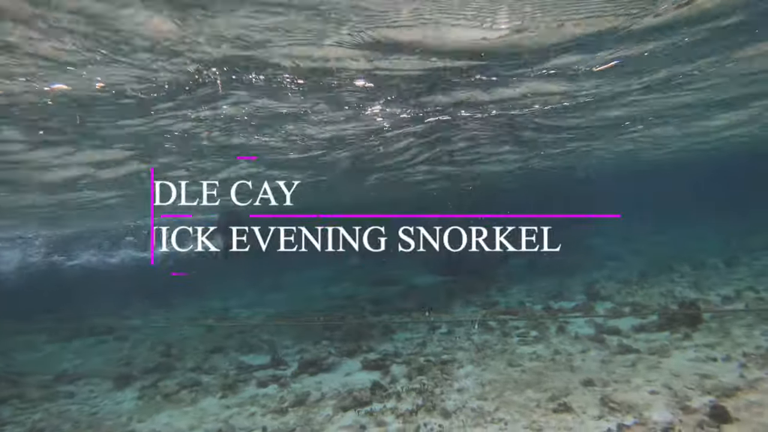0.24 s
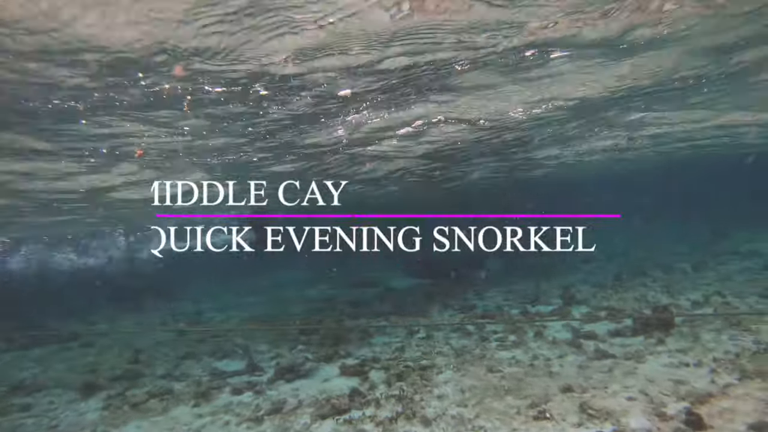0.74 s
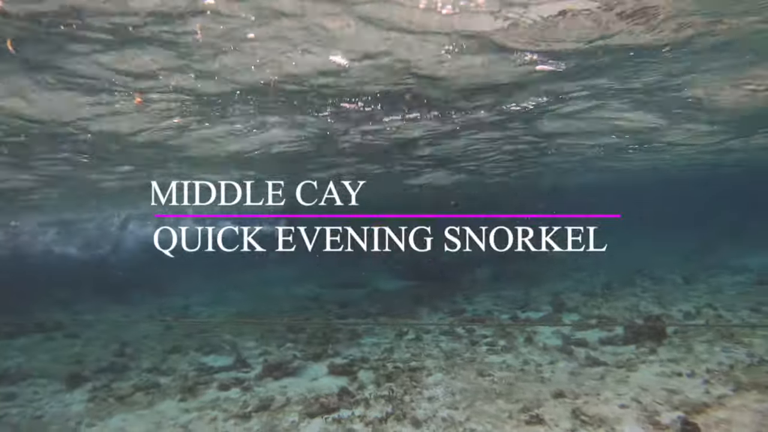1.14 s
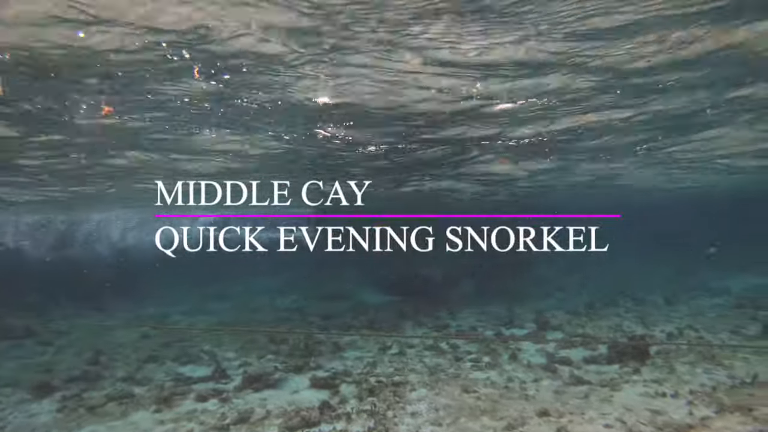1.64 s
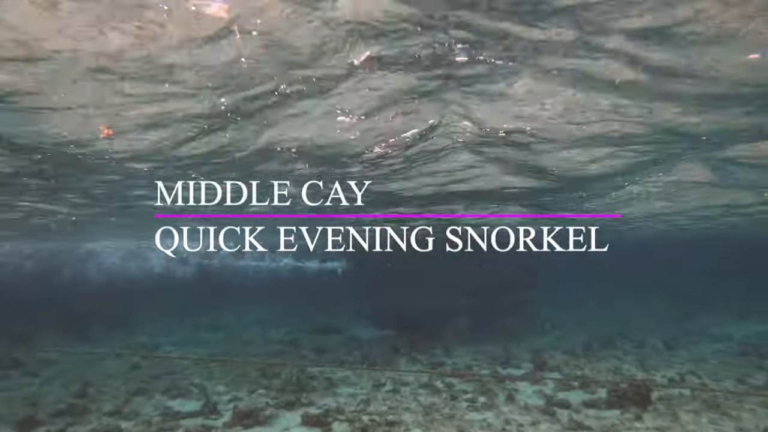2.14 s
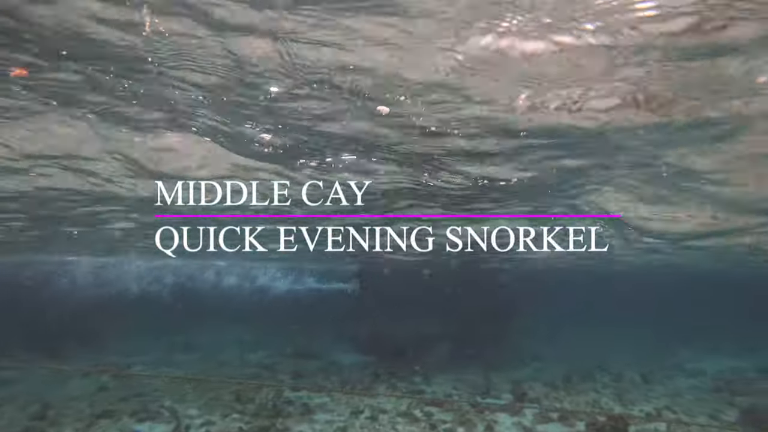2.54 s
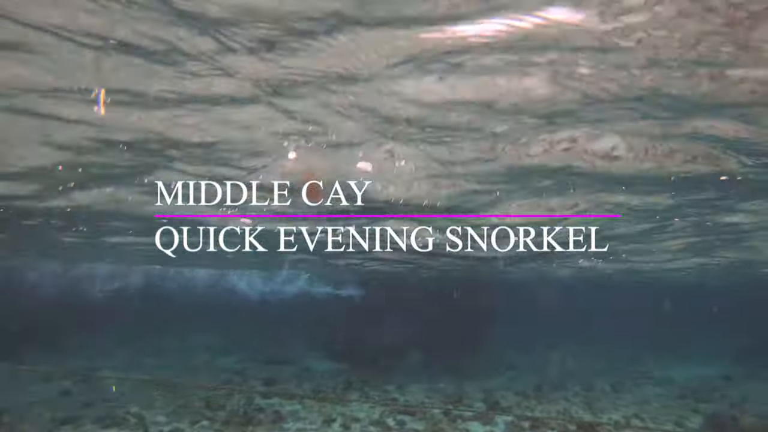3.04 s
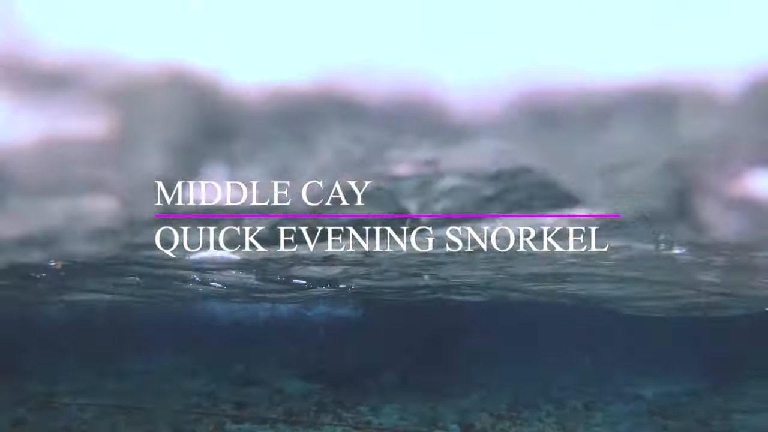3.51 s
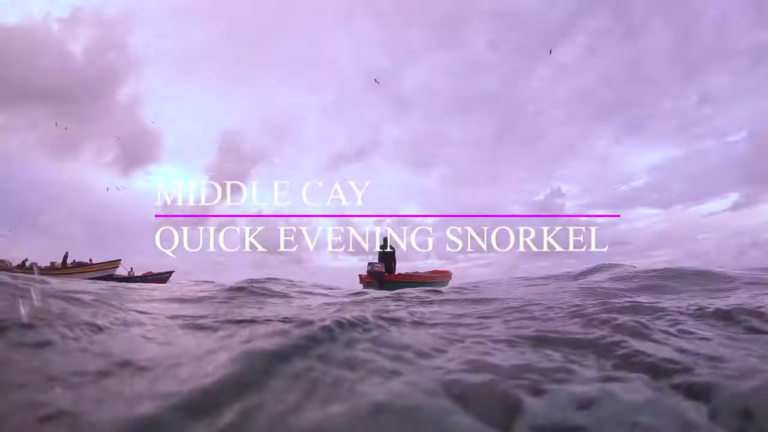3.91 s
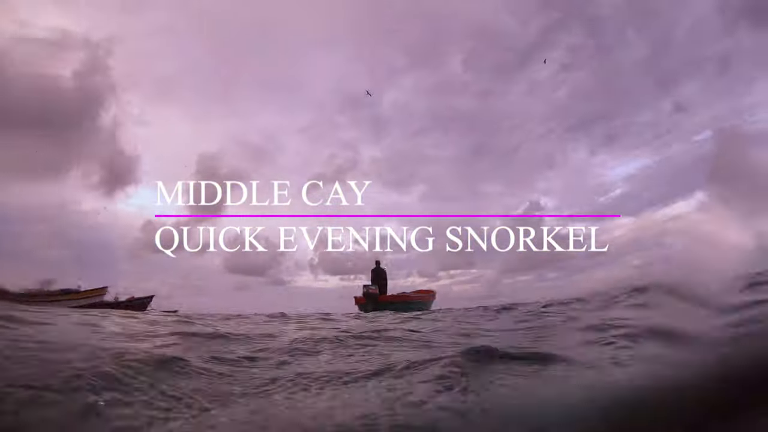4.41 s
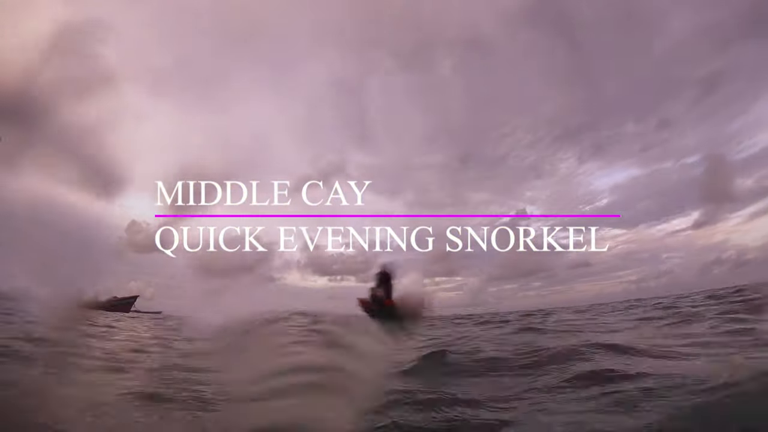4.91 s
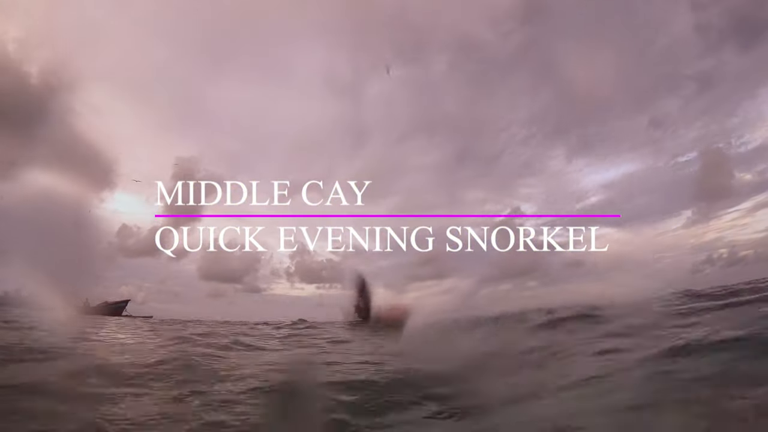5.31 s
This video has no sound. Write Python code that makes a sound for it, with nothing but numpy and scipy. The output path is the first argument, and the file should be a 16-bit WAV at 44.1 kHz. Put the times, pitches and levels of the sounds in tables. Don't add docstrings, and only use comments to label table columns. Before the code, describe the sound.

Rough, ringing bubble crackle from a boat motor heard underwater recedes, then a gurgling break to the surface, trickles, drips and a distant engine.

```python
import sys
import numpy as np
from scipy import signal
from scipy.fft import rfft, irfft, next_fast_len
from scipy.io import wavfile
from scipy.ndimage import map_coordinates

SR = 44100
rng = np.random.default_rng(int(sys.argv[2]) if len(sys.argv) > 2 else 0)


def decibels_to_gain(level_db):
    exponent = np.asarray(level_db, float) / 20
    return 10 ** exponent


def log_audio(samples):
    frames = np.atleast_2d(samples).T
    limited = np.clip(frames, -1, 1)
    pcm = np.round(limited * 32767).astype(np.int16)
    wavfile.write(sys.argv[1], SR, pcm)


N = 245151
T = np.arange(N) / SR


def unit(x):
    return x / np.sqrt(np.mean(x ** 2) + 1e-20)


def along(points, hz):
    f, v = np.transpose(points)
    return np.interp(np.log(hz + 1), np.log(f + 1), v)


def curves(rows, fade=.04):
    s, *cols = np.transpose(rows)
    gate = np.clip(np.minimum(T - s[0] + fade, s[-1] + fade - T) / fade, 0, 1)
    return [np.interp(T, s, c) for c in cols] + [gate]


def wobble(rate):
    knots = rng.standard_normal(int(N * rate / SR) + 4)
    return map_coordinates(knots, [T * rate])


def filtered(x, gain):
    m = 2 * next_fast_len(N // 2 + 4096)
    c = irfft(np.log(gain(np.fft.rfftfreq(m, 1 / SR)) + 1e-10), m)
    c[1:m // 2] *= 2
    c[m // 2 + 1:] = 0
    return irfft(rfft(x, m) * np.exp(rfft(c)), m)[..., :N]


def band(lo_hz, hi_hz, order=3):
    def gain(f):
        below = 1 + (lo_hz / (f + 1)) ** (2 * order)
        above = 1 + (f / hi_hz) ** (2 * order)
        return 1 / np.sqrt(below * above)
    return gain


def pair(side_db):
    mid, side = rng.standard_normal((2, N))
    side = filtered(side, lambda f: decibels_to_gain(side_db(f)))
    return np.array([mid + side, mid - side])


def swells(times, dbs, rise, t60):
    t = T[:SR // 4]
    spikes = np.bincount((np.asarray(times) * SR).astype(int), decibels_to_gain(2 * np.asarray(dbs)), N)[:N]
    power = (1 - np.exp(-t / rise)) ** 2 * decibels_to_gain(-120 * t / t60)
    return np.sqrt(np.abs(signal.fftconvolve(spikes, power)[:N]))


def add(out, s, wave, pan_db=0):
    i = round(s * SR)
    part = (wave * decibels_to_gain(np.array([[.5], [-.5]]) * pan_db))[:, :N - i]
    out[:, i:i + part.shape[1]] += part


def ring(hz, t60, attack, glide=0):
    t = T[:int(min(t60, .3) * SR) + 64]
    tone = np.sin(2 * np.pi * hz * t * (1 + glide * t / t60))
    return tone * decibels_to_gain(-60 * t / t60) * (1 - np.exp(-t / attack)) ** 2


def puff(lo_hz, hi_hz, t60, attack):
    t = T[:3000]
    decay = decibels_to_gain(-60 * t / t60) + 0.027 * decibels_to_gain(-60 * t / (4 * t60))
    burst = decay * (1 - np.exp(-t / attack)) * rng.standard_normal(len(t))
    return signal.sosfilt(signal.butter(6, [lo_hz, hi_hz], "band", fs=SR, output="sos"), burst)


# (time [s], peak level [dB], next turn over it [dB], thump over it [dB])
BURSTS = [(0.0266, -9, -1, -9.5), (0.2126, -8.5, 6.5, -17), (0.336, -6.5, -10, -14.5),
          (0.4259, -18.5, -4.5, -2), (0.531, -15, -3, -10.5), (0.6162, -12, -15, -8),
          (0.703, -18, -6, -5.5), (0.8469, -9.5, -12, -12.5), (0.932, -14.5, -4, -9),
          (1.0711, -16.5, -4.5, -7.5), (1.165, -15.5, 3, -14), (1.3153, -11.5, 7.5, -21),
          (1.43, -7.5, -11, -14), (1.517, -18.5, -11.5, -2.5), (1.637, -32, 18.5, -16),
          (1.751, -15, -8, -16), (1.9016, -13.5, -27, -12.5), (1.983, -18.5, -21, -8.5),
          (2.1335, -19, -9, -11.5), (2.2158, -29, 0.5, -4.5), (2.358, -15, -5.5, -16), (2.449, -21, -7, -5),
          (2.5396, -15.5, 7.5, -20), (2.633, -12.5, -3, -14), (2.7213, -13, -6, -14.5),
          (2.8026, -19, -5.5, -12.5), (2.991, -14.5, -31, -16), (3.0738, -14.5, -17, -16.5),
          (3.191, -37.5, -22, 3.5), (3.297, -28, -8, -2.5)]


def firings():
    first, peak_db, next_db, thump_db = np.transpose(BURSTS)[..., None]
    turn_s, fade_db = 0.029, 7
    first, later = first - .005, np.arange(3)
    times = (first + turn_s * later).ravel()
    level_db = (peak_db + (later > 0) * (next_db - fade_db * (later - 1))).ravel()
    return times, level_db, np.repeat(thump_db, len(later))


# (time [s], level [dB])
CHURN = [
    (0, 0),
    (.9, -1.5),
    (1.6, 0.5),
    (2.3, -3),
    (2.8, -5.5),
    (3.2, -9.5),
    (3.5, -11),
]


def churn():
    return curves(CHURN, fade=0.045)


# (frequency [Hz], side over mid [dB])
PORT_DIFFERENCE = [(60, 5.5), (110, 7), (450, -12), (800, 3.5), (1400, 5.5), (3300, 1.5), (6000, 6)]


def port_noise():
    return pair(lambda f: along(PORT_DIFFERENCE, f))


# (near [Hz], middle [Hz], far [Hz], width [Hz], near level [dB], far level [dB])
CHANNEL_MODES = [(566.4, 585, 599, 98.3, -1.5, -1), (700, 700, 818, 76, -13.5, -17),
                 (870, 870, 530, 76, -19.5, -21.5), (1307, 1342, 1065, 52, -18.5, -22),
                 (1500, 1560, 1491, 76, -4.5, -9), (1750, 1760, 1704, 107, -57.5, -14),
                 (1870, 2027, 2000, 130, -23.5, -25.5), (2123, 2150, 2245, 78, -13.5, -17.5),
                 (2410, 2330, 2470, 90, -25, -17), (2600, 2734, 2716, 102, -24.5, -17.5),
                 (2930, 2946, 3036, 152, -19, -16.5), (3200, 3200, 3277, 121, -18.5, -15),
                 (4070, 4080, 4140, 166, -30, -33), (4390, 4520, 3600, 164, -28.5, -31),
                 (5060, 3550, 4790, 100, -34.5, -31.5), (4360, 4060, 3800, 720, -37, -33),
                 (5570, 5700, 5590, 220, -50.5, -41), (6900, 5900, 5850, 2260, -58, -54)]


def channel(drives):
    out = 0
    for stage in range(3):
        def gain(f):
            power = decibels_to_gain(-2 * 34.0 - f / 75)
            for *centres, width, near_db, far_db in CHANNEL_MODES:
                offset = (f - centres[stage]) / width
                level_db = near_db + (far_db - near_db) * stage / 2
                skirt = np.where(offset < 0, (2.17 * offset) ** 6, (1.123 * offset) ** 4)
                power = power + decibels_to_gain(2 * level_db) / (1 + skirt)
            return np.sqrt(power) * band(20, 12000, order=4)(f)
        share = np.clip(1 - np.abs(np.minimum(T / 1.315, 2) - stage), 0, 1)
        out = out + np.sin(np.pi / 2 * share) * filtered(drives[stage], gain)
    return out


# (time [s], peak level [dB], spatter over it [dB])
NEAR_COLLAPSES = [(0.0275, -9, -20.5), (0.0514, -11, -24.5), (0.0827, -16.5, -28), (0.1087, -17.5, -30),
                  (0.2076, -19, -22), (0.2399, -9, -23.5), (0.276, -19, -28), (0.335, -11, -27.5),
                  (0.3643, -14.5, -24), (0.4222, -19, -21), (0.458, -26, -27), (0.4888, -26, -30),
                  (0.524, -11, -24.5), (0.557, -18.5, -22), (0.5901, -38, -14), (0.6175, -9.5, -15.5),
                  (0.6787, -23.5, -16.5), (0.703, -13, -15), (0.7272, -22, -13.5), (0.7576, -27, -20),
                  (0.784, -22, -20), (0.8448, -8.5, -21.5), (0.8999, -24.5, -17), (0.9295, -10.5, -26),
                  (0.954, -16.5, -23), (0.9805, -25, -29.5), (1.0067, -26.5, -31), (1.0702, -14.5, -26.5),
                  (1.1064, -21, -18), (1.1643, -17.5, -12.5), (1.1927, -14.5, -27.5), (1.3121, -13, -26.5),
                  (1.3426, -10, -23.5), (1.418, -20, -20), (1.4376, -18, -21), (1.4627, -14.5, -22.5),
                  (1.5183, -12, -20.5), (1.544, -15, -29), (1.5728, -30, -27)]
# (time [s], peak level [dB], spatter over it [dB])
FAR_COLLAPSES = [(1.6128, -32, -30), (1.637, -18, -34), (1.6687, -8, -23), (1.731, -27, -17),
                 (1.7506, -16, -23), (1.7753, -20, -24), (1.8996, -13, -27.5), (1.9591, -35, -31),
                 (1.983, -14, -18), (2.1, -26, -34), (2.1322, -13, -24), (2.2156, -17.5, -19),
                 (2.2407, -20.5, -24), (2.294, -31, -19), (2.34, -49, -29), (2.3594, -17, -19.5),
                 (2.4026, -25, -13), (2.431, -35, -27), (2.4488, -16.5, -17.5), (2.478, -16, -35.5),
                 (2.5374, -19.5, -23), (2.5974, -27, -18), (2.634, -15.5, -21.5), (2.6616, -25, -20),
                 (2.72, -12.5, -18), (2.8014, -25, -20), (2.9216, -28, -16.5), (2.9573, -25.5, -18.5),
                 (2.989, -20, -15), (3.0741, -22, -14), (3.191, -34, -8), (3.296, -26.5, -12),
                 (3.3814, -32.5, -14), (3.456, -41, -23)]


def cavitation():
    times, firing_db, _ = firings()
    churn_db, gate = churn()
    when, crack_db, bright_db = np.transpose(list(NEAR_COLLAPSES) + list(FAR_COLLAPSES))
    when = when - .003
    since = T - when[np.maximum(np.searchsorted(when, T) - 1, 0)]
    beat_db = 6.5 * (.5 - since / 0.029 % 1)
    fizz_db = -29 + churn_db + beat_db

    body_db = -38 + 0.98 * churn_db + beat_db + 1.9 * wobble(25.63)
    low = swells(times, firing_db - 10.5, 0.01, 0.069) + decibels_to_gain(body_db) * gate
    mid = swells(when, crack_db + 0.11, 0.0021, 0.062)
    mid = mid + swells(when + 0.0015, crack_db - 11.0, 0.00074, 0.0046) + decibels_to_gain(fizz_db) * gate
    high = swells(when, crack_db + bright_db + 22.5, 0.0015, 0.084) + decibels_to_gain(fizz_db + 1.5) * gate
    hiss = decibels_to_gain(-29 + 0.32 * churn_db - 24.5) * gate
    registers = [(low * decibels_to_gain(-19.5), band(49, 1236, order=6)),
                 (mid * decibels_to_gain(-22.5), band(1164, 3225, order=6)),
                 (high * decibels_to_gain(-26.5), band(3914, 22000, order=6)),
                 (hiss, band(5980, 22000, order=6))]

    shock_db = crack_db + 0.62 * bright_db + 6.5
    shock = np.bincount(((when + 0.001999) * SR).astype(int), decibels_to_gain(shock_db), N)
    shock = filtered(shock, band(2000, 5200, order=4))
    drives = []
    for _ in range(3):
        noise = port_noise()
        drive = shock
        for envelope, gain in registers:
            uneven = decibels_to_gain(2.5 * wobble(220))
            drive = drive + envelope * uneven * filtered(noise, gain)
        drives.append(drive)
    return decibels_to_gain(42) * channel(drives) * decibels_to_gain([[-1.2], [1.2]])


# (time [s], frequency [Hz])
THUMP_PITCH = [(0, 147), (.8, 146.4), (1.3, 115.8), (1.7, 139), (2.3, 127), (2.5, 140.3), (3.3, 134.4)]


def housing_thump():
    times, level_db, thump_db = firings()
    pitch = np.interp(times, *np.transpose(THUMP_PITCH)) * (1 + 0.03 * rng.standard_normal(len(times)))
    thud, knock = np.zeros((2, N)), np.zeros((2, N))
    for s, db, hz in zip(times, level_db + thump_db, pitch):
        add(thud, s + 0.006, decibels_to_gain(db + 6.0) * ring(hz, 0.17, 0.0027))
        add(knock, s + 0.0074, decibels_to_gain(db - 5.5) * ring(229.3, 0.054, 0.0054))
    return knock + filtered(thud[0], band(13, 172.6, order=10))


# (frequency [Hz], density [dB per Hz])
RUMBLE_COLOUR = [(15, -18.5), (30, 0.5), (80, -5), (120, -9), (200, -17.5), (300, -39.5), (600, -61.5),
                 (12000, -105)]


def hum_and_rumble():
    churn_db, gate = churn()
    hum = unit(filtered(rng.standard_normal(N), band(124, 119.5, order=4)))
    rumble = unit(filtered(port_noise(), lambda f: decibels_to_gain(along(RUMBLE_COLOUR, f))))
    hum_level = decibels_to_gain(-37.5 + 1.9 * churn_db)
    rumble_level = decibels_to_gain(-39.5 + 5.15 * wobble(8.394))
    return gate * (hum_level * hum + rumble_level * rumble)


# (time [s], peak level [dB])
SHOVES = [
    (2.068, -33.5),
    (2.095, -30),
    (2.19, -37),
    (2.261, -42),
    (2.499, -28),
    (2.53, -30),
    (2.699, -30),
    (3.334, -30),
    (3.396, -24),
]


def shoves():
    out = np.zeros((2, N))
    for s, db in SHOVES:
        add(out, s, decibels_to_gain(db + 20.5) * puff(156, 660, 0.051, 0.0029))
    return out


# (time [s], peak level [dB], frequency [Hz], t60 [s], pitch glide [fraction])
GULPS = [(2.078, -36, 386, .04, 0.83), (2.498, -24.5, 262, 0.058, 0.3), (2.521, -33, 340, 0.046, 0.28),
         (2.562, -20.5, 230, 0.055, 0.41), (2.568, -18, 451, 0.056, 0.031),
         (2.589, -30, 297, 0.067, -0.0038), (2.695, -28, 416, 0.076, 0.08),
         (3.331, -9.5, 1060, 0.016, -0.035), (3.342, -21, 335, 0.063, -0.68),
         (3.352, -14, 620, 0.027, 0.19), (3.372, -17, 339, 0.078, 0.23), (3.39, -16, 391, 0.092, 0.075),
         (3.399, -27.5, 910, 0.067, .02), (3.406, -20, 604, 0.038, 0.19), (3.413, -9, 297, 0.053, -0.016),
         (3.439, -11.5, 220, 0.074, -0.074), (3.468, -16, 217, 0.11, 0.093),
         (3.496, -18.5, 228.5, 0.099, 0.14), (3.54, -28, 388, 0.067, .05), (3.583, -13, 640, 0.046, 0.25),
         (3.6, -22, 146, 0.21, -0.092), (4.478, -18, 826, 0.066, 0.044), (3.699, -26, 113.3, 0.27, 0.27),
         (4.063, -28, 427, .08, 0.087), (4.705, -20, 648, 0.11, 0.063), (4.941, -25, 400, 0.074, 0.18),
         (5.07, -26, 616, 0.12, 0.24), (5.27, -30, 557, .09, -0.11)]


def gulps():
    out = np.zeros((2, N))
    for s, db, hz, t60, glide in GULPS:
        note = decibels_to_gain(db + 5.5) * ring(hz, t60, 0.005, glide)
        add(out, s, note * [[1], [0]])
        add(out, s + 0.00081, note * [[0], [1]])
    return out


# (time [s], snap level [dB], suck level [dB])
FILM_BURSTS = [(2.098, -34, -9.5), (3.259, -39.5, -21.5), (3.449, -23.5, -13), (3.517, -10.5, -0.5),
               (3.573, -16, -5.5), (3.589, -28.5, -28), (3.53, -28, -33), (3.6755, -13.5, -3),
               (4.114, -38.5, -12.5), (4.137, -27, -25), (4.165, -35.5, -13.5), (4.389, -30, -19),
               (4.411, -32.5, -16)]


def film_bursts():
    out, t = np.zeros((2, N)), T[:2000]
    for s, snap_db, suck_db in FILM_BURSTS:
        snap = decibels_to_gain(snap_db + 11.5 - 60 * t / 0.016) * np.sin(4 * np.log(1 + t / 0.0006))
        suck = -decibels_to_gain(suck_db + 8.0) * np.sin(2 * np.pi * 129 * t / (1 + t / 0.037))
        suck = suck * decibels_to_gain(-60 * t / 0.019) * (1 - np.exp(-(t / 0.0022) ** 2))
        click = -decibels_to_gain(snap_db + 7.5 - 60 * t / 0.0012) * (1 - np.exp(-t / 0.00007)) ** 2
        add(out, s, click, 3)
        add(out, s, np.array([suck - snap, 0.86 * snap - 0.21 * suck]))
    return out


# (frequency [Hz], density [dB per Hz])
AIR_COLOUR = [(15, -44), (25, -11), (75, -7.5), (235, -14.5), (355, -5.5), (600, -17), (2600, -45),
              (5000, -54), (6500, -63.5), (10000, -63), (14000, -99)]
# (frequency [Hz], width [Hz], level [dB])
AIR_RESONANCES = [(230, 32, 2), (349.7, 36, 5.5), (1850, 340, 10), (3080, 200, 8), (4720, 450, 16),
                  (7300, 660, 15)]


def resonant_colour(f):
    level_db = along(AIR_COLOUR, f)
    for centre, width, db in AIR_RESONANCES:
        level_db = level_db + db / (1 + (2 * (f - centre) / width) ** 2)
    return decibels_to_gain(level_db)


# (time [s], level [dB])
SWELL = [
    (3.33, -6),
    (3.45, -1),
    (3.62, 5),
    (3.85, -4.5),
    (4.25, 2.2),
    (4.6, -4),
    (4.95, -8),
    (5.2, 1.5),
    (5.56, 5),
]
# (time [s], peak level [dB])
SHEETS = [(3.33, -66), (3.4, -53), (3.47, -53), (3.556, -58), (3.619, -46), (3.7, -55), (3.75, -58),
          (3.866, -56), (3.895, -50), (3.955, -52), (4.013, -68), (4.112, -51), (4.16, -52), (4.22, -53),
          (4.342, -52.5), (4.372, -61), (4.5, -73), (4.79, -71), (4.92, -56), (5.06, -57.5), (5.15, -47.5),
          (5.21, -49), (5.26, -46), (5.33, -45.5), (5.45, -48), (5.535, -49)]


def wash():
    swell_db, gate = curves(SWELL, fade=0.014)
    trickle_db = -61.5
    wet = swells(*np.transpose(SHEETS), 0.003, 0.26) + decibels_to_gain(trickle_db)
    wet_db = 20 * np.log10(wet) - trickle_db
    noise = pair(lambda f: np.full_like(f, -3.5))
    throb_span = np.clip(np.minimum(T - 3.55, 4.65 - T) / .2, 0, 1)
    throb_db = 11 * (.5 - (31.5 * T + .3) % 1) * throb_span
    grit = decibels_to_gain(throb_db + 3 * wobble(300))
    clear_db = -7.5 * (T > 4.55)
    # (level [dB], low [Hz], high [Hz], lump depth [dB], lump rate [per s], grain)
    layers = [(-34.0 + 0.77 * swell_db, 19.9, 183.5, 2.54, 18, 1),
              (-41.5 + 0.94 * swell_db, 200, 640, 5.5, 22, 1),
              (-55 + 0.75 * wet_db, 1150, 2300, 3.8, 38, grit),
              (-60.5 + 1.22 * wet_db + clear_db, 2900, 3900, 2.5, 45, grit),
              (-67.0 + 0.69 * wet_db, 4250, 6000, 4.0, 30, grit),
              (-68 + 0.25 * wet_db, 2200, 5100, 2.2, 12, 1),
              (-84.5 + .4 * wet_db, 6900, 8200, 5.5, 7, 1)]
    out = 0
    for level_db, lo, hi, lump_db, rate, grain in layers:
        colour = lambda f: resonant_colour(f) * band(lo, hi, order=5)(f)
        out = out + decibels_to_gain(level_db + lump_db * wobble(rate)) * unit(filtered(noise * grain, colour))
    return gate * out


def froth(count=280):
    out = np.zeros((2, N))
    for when, pitch, size, pan in rng.random((count, 4)):
        hz = 480 * 6 ** pitch
        level_db = -43.5 - 11 * pitch - 4.9 * np.log(size + 0.012)
        add(out, 3.35 + 2.15 * when, decibels_to_gain(level_db) * ring(hz, 24 / hz, 0.8 / hz, 0.089), 8 * (pan - .5))
    return out


# (time [s], peak level [dB])
MIST = [(3.44, -72), (3.66, -72), (3.894, -71), (4.11, -74), (4.18, -66), (4.25, -57), (4.33, -64),
        (4.365, -61), (4.49, -62.5), (4.789, -62), (5.17, -76), (5.33, -72)]
# (frequency [Hz], density [dB per Hz])
MIST_COLOUR = [(4500, -33), (5800, -9.5), (7900, 5.5), (9300, -8), (12300, -11.5), (13200, -28),
               (16000, -75.5)]


def mist():
    level = swells(*np.transpose(MIST), 0.011, 0.24)
    grains = pair(lambda f: np.full_like(f, -5.5)) * decibels_to_gain(3.6 * wobble(500))
    hiss = unit(filtered(grains, lambda f: decibels_to_gain(along(MIST_COLOUR, f))))
    return level * decibels_to_gain(3.9 * wobble(67)) * hiss


# (time [s], peak level [dB], frequency [Hz], t60 [s])
SMALL_BUBBLES = [(3.457, -22, 2450, 0.016), (3.6296, -37, 1750, 0.045), (4.1913, -36, 1740, 0.028),
                 (4.2633, -7.5, 1450, 0.012), (4.271, -22.5, 1350, 0.052), (4.2778, -24, 1267, 0.048),
                 (4.8296, -30, 1620, 0.014), (5.2912, -9.5, 1910, 0.014), (5.317, -26, 1150, 0.015),
                 (5.3298, -4.5, 1724, 0.015), (5.3467, -32.5, 2290, 0.035), (5.3662, -42, 1670, 0.032)]
# (time [s], peak level [dB], frequency [Hz], t60 [s])
TINY_BUBBLES = [
    (3.687, -42, 6500, 0.012),
    (4.12, -55, 4600, 0.071),
    (4.134, -30.5, 3250, 0.031),
    (4.158, -33, 3200, 0.024),
    (4.252, -43, 3250, 0.061),
    (4.277, -20, 3310, 0.015),
    (4.372, -48, 8050, 0.025),
    (4.394, -51, 8000, 0.031),
    (5.452, -51, 4780, 0.057),
]


def small_bubbles():
    out = np.zeros((2, N))
    for s, db, hz, t60 in list(SMALL_BUBBLES) + list(TINY_BUBBLES):
        add(out, s, decibels_to_gain(db + 3.5) * ring(hz, t60, 0.00031, -0.011))
    return out


# (time [s], peak level [dB], frequency [Hz], left over right [dB])
PLOPS = [(3.476, -22, 660, -15), (3.622, -25.5, 700, -10), (3.744, -30, 700, -6), (3.856, -34, 707, 4),
         (3.89, -28, 748, 4), (4.183, -28.5, 722, -0.5), (4.374, -40.5, 732, 14), (4.47, -20.5, 852, 4),
         (4.548, -37, 596, -6), (4.652, -37, 760, -10), (4.7, -40, 555, -9), (4.861, -39, 774, -2),
         (5.001, -38, 816, -10), (5.121, -35, 854, -1), (5.239, -31, 825, -11), (5.386, -40, 736, -14),
         (5.436, -35.5, 870, -8)]


def plops():
    out = np.zeros((2, N))
    for s, db, hz, pan in PLOPS:
        add(out, s, decibels_to_gain(db + 8) * ring(hz, 34 / hz, 0.0021, 0.024), pan)
    return out


# (time [s], bright peak level [dB], body level [dB])
SPRAY = [(3.686, -52, -33), (3.97, -75, -14), (4.1352, -65, -49), (4.225, -43, -29.5), (4.266, -50, -28),
         (4.2802, -29.5, -12), (4.3717, -50, -33), (4.393, -53, -32), (4.4731, -37, -39), (4.503, -42, -48),
         (4.804, -32, -17.5), (4.8312, -41, -48), (5.0616, -62.5, -31.5), (5.183, -42, -30),
         (5.254, -41, -30.5), (5.276, -66, -29), (5.325, -77, -35)]
# (time [s], peak level [dB])
DRIPS = [(3.906, -30), (4.2024, -44), (4.3404, -30), (4.8444, -37), (4.892, -38), (5.0814, -42),
         (5.223, -34), (5.3413, -45)]


def droplets():
    out = np.zeros((2, N))
    for s, db, body_db in SPRAY:
        bright = decibels_to_gain(db - 2.5) * puff(6300, 11000, 0.01, 0.00097)
        body = decibels_to_gain(body_db + 5.5) * puff(440, 4250, 0.0097, 0.00061)
        add(out, s - .001, bright + body)
    for s, db in DRIPS:
        add(out, s - .0005, decibels_to_gain(db + 2.5) * puff(2200, 4700, 0.015, 0.00096))
    return out


# (time [s], peak level [dB], frequency [Hz])
CAVITY_NOTES = [(3.727, -34, 1650), (3.752, -33, 3000), (3.772, -34, 3040), (3.8666, -39, 1900),
                (3.898, -32, 1850), (3.9047, -28, 3000), (3.958, -36, 3360), (4.0146, -41, 1840),
                (4.0386, -45, 1900), (4.1046, -37, 1620), (4.3405, -35, 3080), (4.377, -24, 3200),
                (4.587, -37, 1540), (4.7546, -35, 1500), (4.8713, -39, 1950), (4.9215, -37, 1980),
                (5.1582, -36, 1560), (5.482, -45, 1940)]


def cavity_notes():
    out = np.zeros((2, N))
    for s, db, hz in CAVITY_NOTES:
        add(out, s, decibels_to_gain(db - 1.5) * ring(hz, 60 / hz, 0.0011, 0.011))
    return out


# (time [s], peak level [dB])
PUTTS = [(3.781, -26.5), (3.949, -22.5), (4.003, -30), (4.059, -24.5), (4.103, -31), (4.193, -27),
         (4.258, -27), (4.301, -34), (4.338, -31), (4.376, -26), (4.422, -24), (4.471, -32), (4.531, -24.5),
         (4.592, -24.5), (4.652, -23), (4.702, -25), (4.745, -21), (4.793, -23.5), (4.843, -25),
         (4.888, -26), (4.933, -23), (4.998, -24.5), (5.065, -21), (5.116, -21), (5.174, -26), (5.212, -45),
         (5.265, -25.5), (5.326, -30), (5.432, -22.5), (5.529, -23.5)]


def putter():
    out = np.zeros((2, N))
    crest_s, period_s = 4.4, 0.49
    for s, db in PUTTS:
        pipe, boom = rng.standard_normal(2)
        since = s - crest_s
        boom_db = -21.5 - 8.4 * since + 8 * np.cos(2 * np.pi * since / period_s)
        add(out, s, decibels_to_gain(db + 2.0) * ring(352 + 5 * pipe, 0.072, 0.0032))
        add(out, s, decibels_to_gain(boom_db) * ring(85 + 6 * boom, 0.17, 0.0073))
    return out


def scene():
    motor = cavitation() + housing_thump() + hum_and_rumble()
    surfacing = shoves() + gulps() + film_bursts() + wash() + froth() + mist()
    dripping = small_bubbles() + plops() + droplets() + cavity_notes()
    return motor + surfacing + dripping + putter()


# (time [s], side gain [dB])
WIDTH = [(0, -47), (1.58, -47), (1.66, -26), (2.1, -10), (4.0, -3), (4.45, -12), (4.56, -31), (4.9, -58),
         (5.56, -79)]


def blend_ports(dry):
    mid = (dry[0] + dry[1]) / 2
    side = (dry[0] - dry[1]) / 2 * decibels_to_gain(np.interp(T, *np.transpose(WIDTH)))
    return np.array([mid + side, mid - side])


def low_pass(x):
    return signal.sosfilt(signal.butter(12, 14800, fs=SR, output="sos"), x)


def record(dry):
    fade = np.clip((T[-1] - T) / .008, 0, 1)
    return low_pass(fade * blend_ports(dry))


dry = scene()
out = record(dry)
log_audio(out)
```